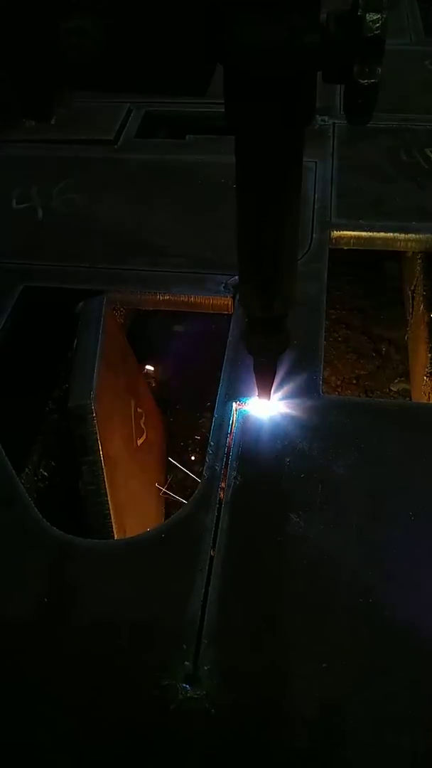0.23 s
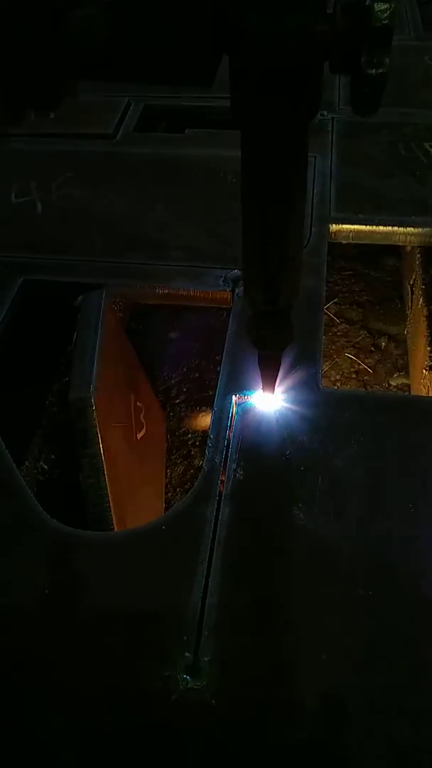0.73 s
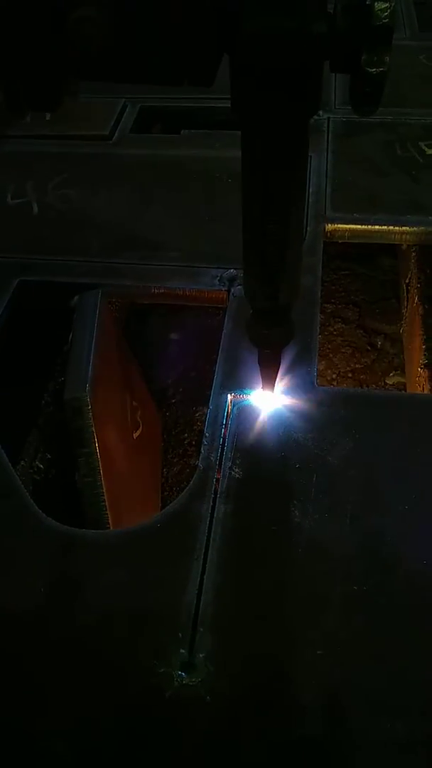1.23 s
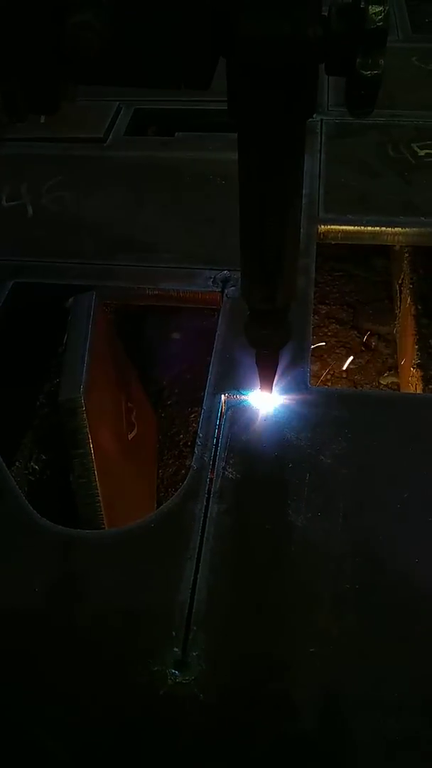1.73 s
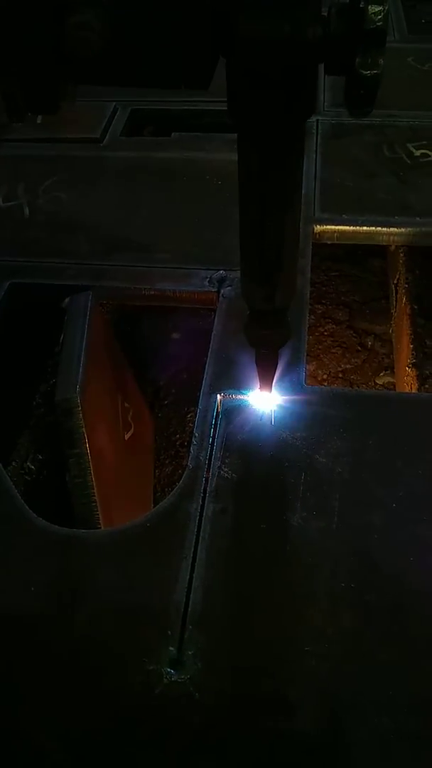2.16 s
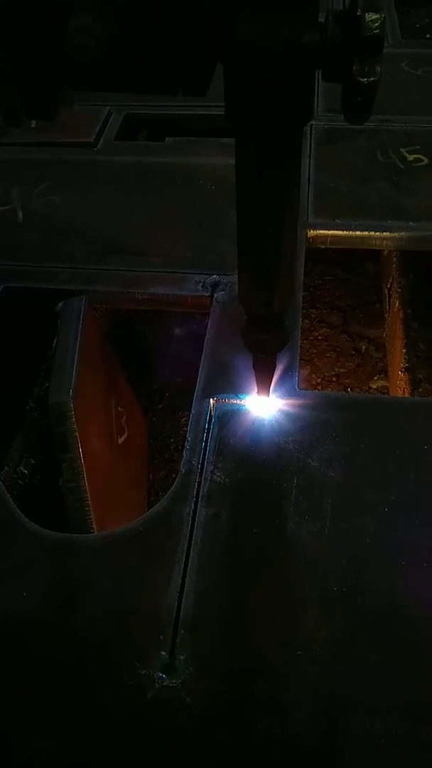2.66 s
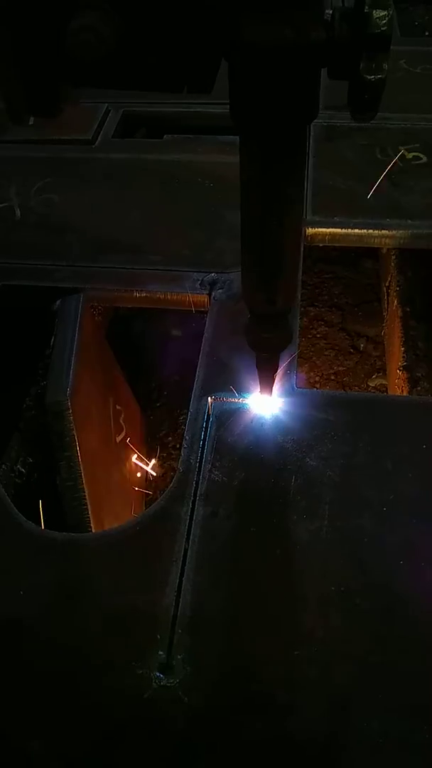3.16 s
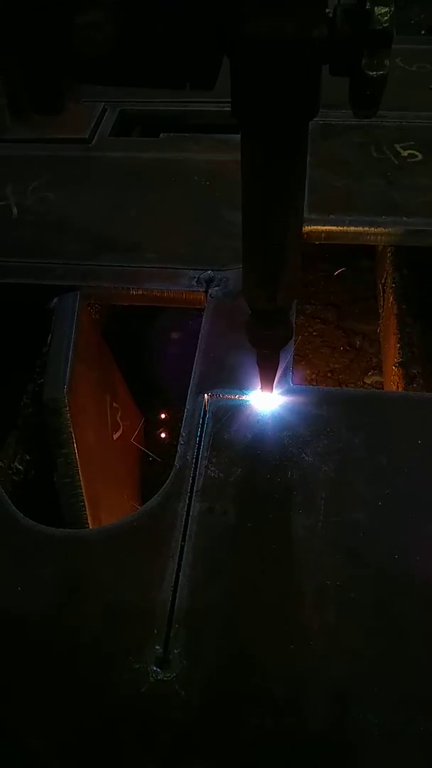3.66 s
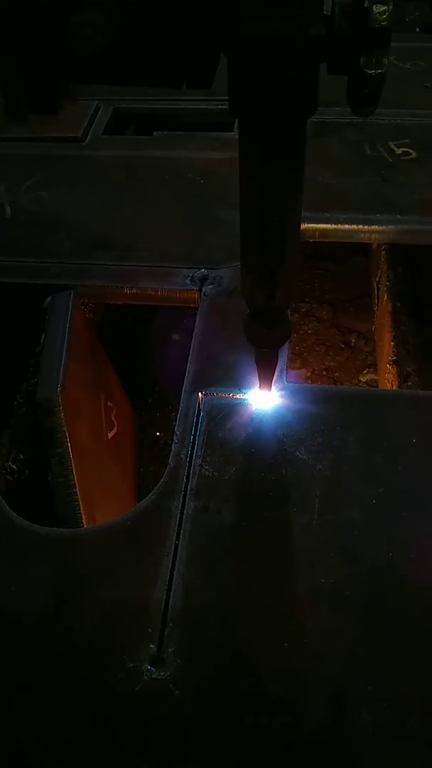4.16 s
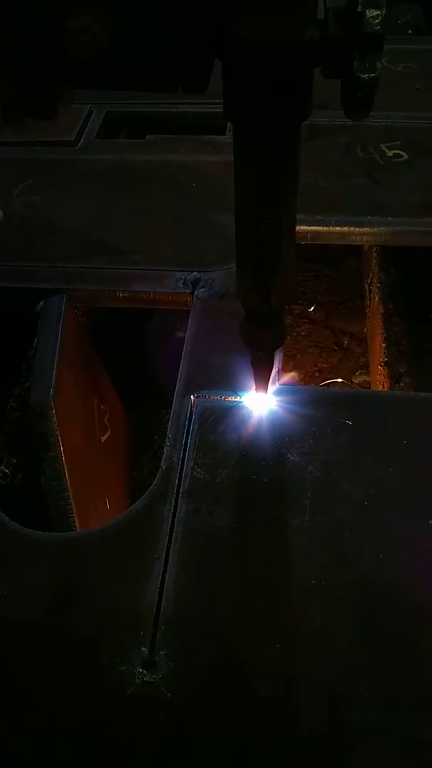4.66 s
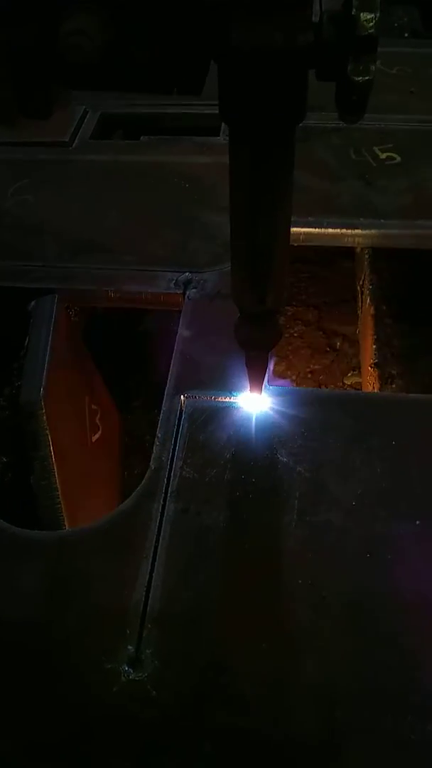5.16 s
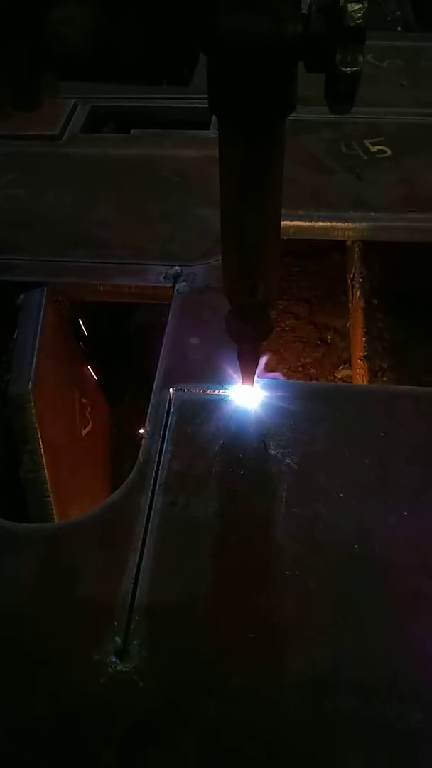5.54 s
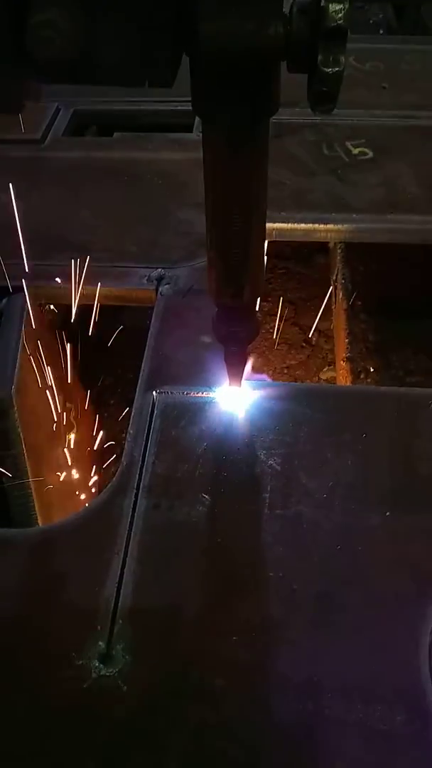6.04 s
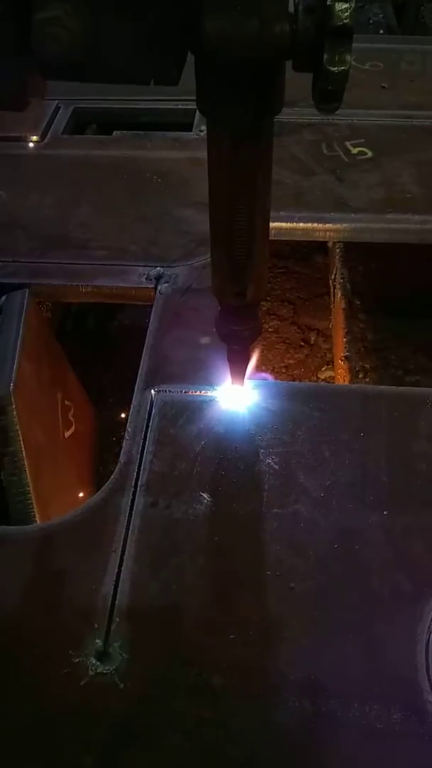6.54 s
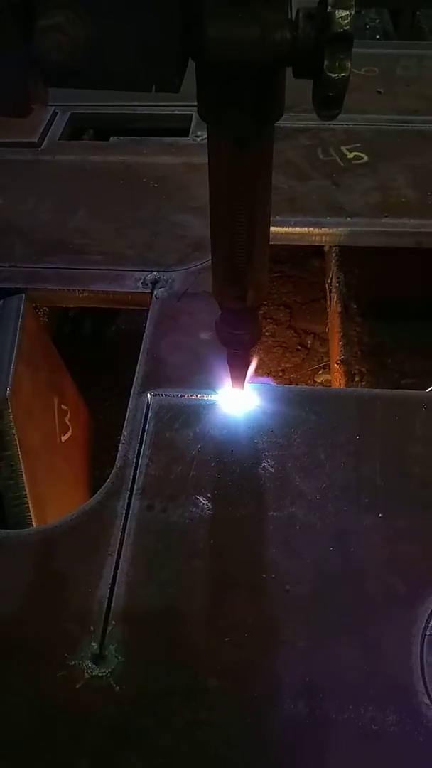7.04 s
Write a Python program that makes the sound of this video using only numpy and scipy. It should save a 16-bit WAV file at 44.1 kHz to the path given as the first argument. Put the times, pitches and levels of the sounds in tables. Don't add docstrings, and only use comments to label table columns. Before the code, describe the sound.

Close stereo microphone at a steel cutting table: an unbroken rush of oxygen and flame, sharp and sizzling on top, rough and airy below. Low gulping puffs come around one and a half seconds, and the hum of a drive motor gains weight and wavers slowly. The jet strengthens near two and a half seconds, later flares and chokes slightly, and continues to the end.

```python
import sys
import numpy as np
from scipy import signal
from scipy.io import wavfile
from scipy.ndimage import uniform_filter1d

SR = 44100
rng = np.random.default_rng(int(sys.argv[2]) if len(sys.argv) > 2 else 0)


def ratio_of_db(decibels):
    return 10 ** (np.asarray(decibels, float) / 20)


def master_out(mix):
    frames = np.transpose(np.atleast_2d(mix))
    ceiling = np.clip(frames, -1, 1)
    pcm = np.round(ceiling * 32767).astype(np.int16)
    wavfile.write(sys.argv[1], SR, pcm)


N = 321930


def evened(x):
    return x / np.sqrt(np.mean(abs(x) ** 2) + 1e-20)


def read(points, hz, column=1):
    table = np.transpose(points)
    return np.interp(np.log(hz + 1), np.log(table[0] + 1), table[column])


def bell(x, centre, width):
    return np.exp(-(2 * (x - centre) / width) ** 2)


def bumps(table, t, hz, spread):
    total_db = 0
    for at_s, length_s, rise_db, centre_hz in table:
        over_hz = np.exp(-(np.log((hz + 1) / centre_hz) / spread) ** 2)
        total_db = total_db + rise_db * np.outer(over_hz, bell(t, at_s, length_s))
    return total_db


def drift(t, low_hz, top_hz, count=30):
    hz = np.geomspace(low_hz, top_hz, count)[:, None]
    sines = np.sin(2 * np.pi * (hz * t + rng.random((count, 1))))
    return evened((sines / np.sqrt(hz)).sum(0))


def motor():
    # loaded_db, idle_db, loaded_fade_db_per_s, beat_depth_db
    multiples = [(-44.5, -53, -.1, 0), (-41, -42, 0.5, 2.8), (-45, -49.5, -0.04, 0.4),
                 (-46.5, -66, -2.9, 1.5)]
    # right_minus_left_db, phase_rad
    multiple_ports = [(-4, -1.1), (-16, 2.0), (-9, -.3), (-6, -.7)]
    # multiple, left_db, right_db
    faint_tones = [(.707, -66, -59.5), (1.5, -58, -59.5), (2.3, -52.5, -57), (4.5, -55, -60), (6, -64, -67)]
    # centre_s, length_s, change_db, multiple
    turns = [
        (1.25, 0.64, -16, 1),
        (2.59, 0.33, -6, 1),
        (3.56, 0.3, 5.5, 2),
        (3.04, .4, 4.5, 3),
        (3.75, .3, 3.5, 3),
        (4.44, 0.38, -14, 3),
        (5.72, 0.62, -4, 3),
        (2.9, .8, -10, 4),
        (4.4, 0.47, 8, 4),
        (6.4, .4, -11, 4),
    ]
    pitch_hz, waver_db = 169.18, 3
    load_s, load_rise_s = 1.62, 0.08
    beat_period_s, beat_crest_s = 2.37, 3.07

    t = np.arange(N) / SR
    load = 1 / (1 + np.exp(-(t - load_s) / load_rise_s))
    beat = np.cos(2 * np.pi * (t - beat_crest_s) / beat_period_s)
    phase = 2 * np.pi * pitch_hz * t
    out = np.zeros((2, N))
    for k, (right_db, right_rad) in enumerate(multiple_ports):
        loaded_db, idle_db, fade, beat_db = multiples[k]
        under_load_db = loaded_db - idle_db + fade * (t - load_s)
        level_db = idle_db + load * under_load_db + beat_db * beat
        for at_s, length_s, change_db, multiple in turns:
            if round(multiple) == k + 1:
                level_db += change_db * bell(t, at_s, length_s)
        left = np.sin((k + 1) * phase)
        right = ratio_of_db(right_db) * np.sin((k + 1) * phase + right_rad)
        out += np.sqrt(2) * ratio_of_db(level_db) * np.array([left, right])

    coarse_s = t[::512]
    for multiple, left_db, right_db in faint_tones:
        waver = ratio_of_db(waver_db * np.interp(t, coarse_s, drift(coarse_s, 0.251, 2.3)))
        tone = waver * np.sin(multiple * phase + 2 * np.pi * rng.random())
        out += np.sqrt(2) * ratio_of_db(np.array([[left_db], [right_db]])) * tone
    return out


def layer_levels(t, place):
    # start_s, jet_db (oxygen strength), depth_db (reach into the kerf)
    torch_course = [(0, -21, 0), (.45, -20, 0.5), (.6, -17.5, -1), (.95, -17, -1.5), (1.35, -15.5, -1),
                    (1.5, -18, -0.5), (2.15, -17.5, 0), (2.5, -13.5, 0), (2.8, -14.5, 0.5), (3.0, -15, 0),
                    (3.4, -17.5, 0), (3.9, -17, 0.5), (4.25, -16, 1.5), (4.8, -17, 2), (5.0, -18, 1.5),
                    (5.6, -19, 1.5), (5.9, -18, 1.5), (7.3, -18, -1.5)]
    # centre_s, length_s, rise_db
    flares = [
        (1.65, .12, 1.5),
        (3.75, 0.084, -1),
        (3.9, 0.1, 1),
        (4.448, 0.25, 0),
        (5.24, 0.13, 1.5),
        (6.2, 0.35, -1),
        (6.466, 0.13, 2.6),
        (7.156, .15, -2),
    ]
    # jet_share, depth_share, fade_db_per_s (torch travels away), wander_db
    layers = [
        (.5, 0.28, -0.31, .5),
        (0.25, 0.62, -0.27, 0.28),
        (0.21, 0.96, 0, -0.05),
        (0.96, 0, 0, 0.77),
    ]
    s, jet_points_db, depth_points_db = np.transpose(torch_course)
    jet_db = np.interp(t, s, jet_points_db)
    for at_s, length_s, rise_db in flares:
        jet_db += rise_db * bell(t, at_s, length_s)
    depth_db = np.interp(t, s, depth_points_db)
    level_db = 0
    for k, (jet_share, depth_share, fade, wander_db) in enumerate(layers):
        layer_db = jet_share * jet_db + depth_share * depth_db + fade * t
        layer_db += wander_db * drift(t, 0.99, 6)
        weight = np.maximum(1 - abs(place - k), 0)
        level_db = level_db + np.outer(weight, layer_db - layer_db.mean())
    return level_db


def torch_colour(hz):
    # freq_hz, density_db_per_hz
    jet_spectrum = [(25, -49), (80, -14.5), (200, -13), (600, -13.5), (1300, -15.5), (2200, -9),
                    (3500, -11), (4500, -7), (6500, -5.5), (8200, -6.5), (10000, 0), (12000, 0.5),
                    (13300, 0.5), (15000, -9.5)]
    # centre_hz, width_hz, rise_db
    cavity = [(426, 180, 3.5), (1325, 300, 3.5), (1953, 56, -8.5), (2490, 100, 0), (3002, 580, 3.5),
              (4180, 780, 2.5), (4590, 840, 2.5), (5410, 560, 4), (5980, 630, 2), (6960, 510, 4.5),
              (7680, 280, 5.5), (8550, 960, 4), (11950, 200, 4), (14150, 170, 6)]
    colour_db = read(jet_spectrum, hz)
    for centre_hz, width_hz, rise_db in cavity:
        colour_db += rise_db * bell(hz, centre_hz, width_hz)
    return colour_db


def port_pair(left, other, t, hz):
    # freq_hz, likeness_0_to_1, left_minus_right_db
    ports = [(39.7, 1, -6.5), (120, 0.66, 4), (300, 0.52, 2), (700, 1, 1.5), (1214, 0.9, 0.5),
             (2260, 1, -0.5), (3530, .82, -2.5), (5810, .8, 1.5), (7480, 0.48, -1.5), (9100, 0.52, 3.5),
             (10100, 0.09, 1.5), (12760, 0.9, 3.5), (14000, 0.4, -1.5)]
    # start_s, lag_change_samples
    sway = [(0, 0.029), (.6, -0.14), (.85, -0.18), (1.3, -0.047), (1.6, 0.11), (2.3, -0.037), (3, -0.067),
            (3.7, 0.034), (4.5, -0.05), (5.2, 0.087), (6, 0.028), (6.7, -0.13), (7.3, -0.22)]
    lag_s = 19.8 / 44100 + np.interp(t, *np.transpose(sway)) / SR
    same = np.clip(read(ports, hz), 0, 1)[:, None]
    tilt = ratio_of_db(read(ports, hz, column=2) / 2)[:, None]
    late = -np.exp(-2j * np.pi * np.outer(hz, lag_s))
    right = late * (same * left + np.sqrt(1 - same ** 2) * other)
    return np.array([tilt * left, right / tilt])


def torch():
    # centre_s, length_s, rise_db, centre_hz
    puffs = [
        (.12, .1, 3, 400),
        (1.1, .1, 7, 170),
        (1.41, .1, 8, 230),
        (1.65, .1, 6, 230),
        (4.8, .08, 4, 300),
        (6.5, .1, 3, 330),
        (6.78, .1, 3, 200),
    ]
    patchy_db, ridge_db, flicker_db, sputter_db = 0.65, 1.46, 0.5, 0.72
    frames, hz = N // 256 + 5, np.fft.rfftfreq(1024, 1 / SR)
    t = np.arange(frames) * 256 / SR
    a, b, c, d, patches, ridges = rng.standard_normal((frames, 513, 6)).T
    ridges = uniform_filter1d(ridges, size=9, axis=0)
    ridges = evened(uniform_filter1d(ridges, size=180, axis=1))
    patches = uniform_filter1d(patches, size=16, axis=0)
    patches = evened(uniform_filter1d(patches, size=9, axis=1))

    place = np.interp(np.log(hz + 1), np.log([600, 2800, 7000, 11000]), np.arange(4))
    level_db = torch_colour(hz)[:, None] + layer_levels(t, place)
    level_db += bumps(puffs, t, hz, 0.5)
    level_db += patchy_db * patches + ridge_db * ridges
    high = (place / 3)[:, None]
    level_db += flicker_db * high * drift(t, 8.8, 70)
    level_db += sputter_db * (1 - high) * drift(t, 11, 40)

    z = port_pair(a + 1j * b, c + 1j * d, t, hz) * ratio_of_db(level_db)
    sound = signal.istft(z, nperseg=1024, noverlap=768)[1][:, :N]
    return ratio_of_db(-16.0) * evened(sound)


def joint_stereo(x):
    # freq_hz, band_threshold_db, line_threshold_db (both against the stronger one)
    thresholds = [(58, -9, -3.5), (300, -30, -29), (810, -11.5, -23), (1067, -5.5, -8.5),
                  (1414, -8.5, -4.5), (2146, -5, -3.5), (3490, -7, 0), (4330, -5.5, -1), (5460, -7, -2.5),
                  (6530, -9.5, -3.5), (7960, -9, -4), (12500, -8, -9.5), (13300, -5.5, -2.5),
                  (14300, -5, -1)]
    band_starts = [*range(0, 40, 4), *range(40, 96, 8),
                   96, 108, 120, 132, 144, 160, 176, 196, 216, 240, 264, 292, *range(320, 1000, 32)]
    # centre_s, length_s, rise_db, centre_hz
    shortages = [
        (.87, .2, 9, 4800),
        (1.35, .4, 12, 4500),
        (1.65, .1, 8, 4700),
        (2.3, .55, 7, 4600),
        (3.7, .2, 5, 4100),
        (4.35, .7, 5, 4300),
        (5.3, .6, 6, 4300),
        (6.75, .5, 9, 2700),
        (6.28, .06, 9, 2700),
        (6.4, .2, 5, 4800),
    ]
    squeeze, dither_db, refill, budget_db = 0.78, 2.0, 1.0, 1.5
    window = np.sin(np.pi * (np.arange(2048) + .5) / 2048)
    start = 1024 - 834
    pair = np.pad([x[0] + x[1], x[0] - x[1]], ((0, 0), (start, 0))) / 2
    hz, t, z = signal.stft(pair, SR, window, 2048, 1024)
    band = np.searchsorted(band_starts, np.arange(len(hz)), "right") - 1
    band_width = np.diff(band_starts, append=len(hz))[:, None]

    def band_mean(p):
        return (np.add.reduceat(p, band_starts, -2) / band_width)[..., band, :]

    power = abs(z) ** 2
    mean = band_mean(power)
    strong = mean.max(0)
    near = uniform_filter1d(power.sum(0), size=60, axis=0)
    near = uniform_filter1d(near, size=7, axis=1)
    share_db = 10 * np.log10(near / near.mean(0) + 1e-12)
    load_db = squeeze * (share_db.mean(1, keepdims=True) - share_db)
    load_db += dither_db * rng.standard_normal((z.shape[2], band[-1] + 1)).T[band]
    short_db = bumps(shortages, t - start / SR, hz, .13)
    short_db += budget_db * rng.standard_normal(z.shape[2])

    band_db = np.minimum(read(thresholds, hz)[:, None] + load_db + short_db, -.1)
    line_db = read(thresholds, hz, column=2)[:, None] + load_db
    keep = mean > strong * ratio_of_db(2 * band_db)
    keep &= power > strong * ratio_of_db(2 * line_db)
    lost = np.clip(mean / (band_mean(power * keep) + 1e-20), 1, 4)
    z *= keep * lost ** (refill / 2)
    mid, side = signal.istft(z, SR, window, 2048, 1024)[1][:, start:start + N]
    return np.array([mid + side, mid - side])


def scene():
    return motor() + torch()


def top_cut(x):
    return signal.sosfilt(signal.butter(12, 15040, fs=SR, output="sos"), x)


def record(dry):
    edge = signal.firwin(701, 14230, window=("kaiser", 9), fs=SR)
    limited = signal.oaconvolve(dry, edge[None], "same")
    mix = joint_stereo(limited)
    return top_cut(mix)


dry = scene()
out = record(dry)
master_out(out)
```